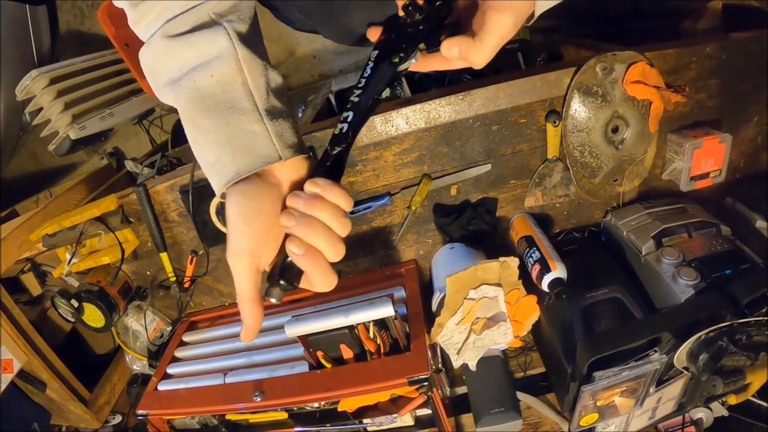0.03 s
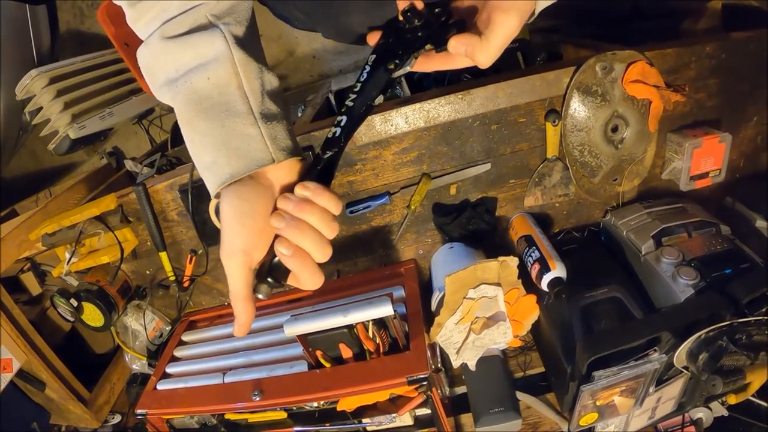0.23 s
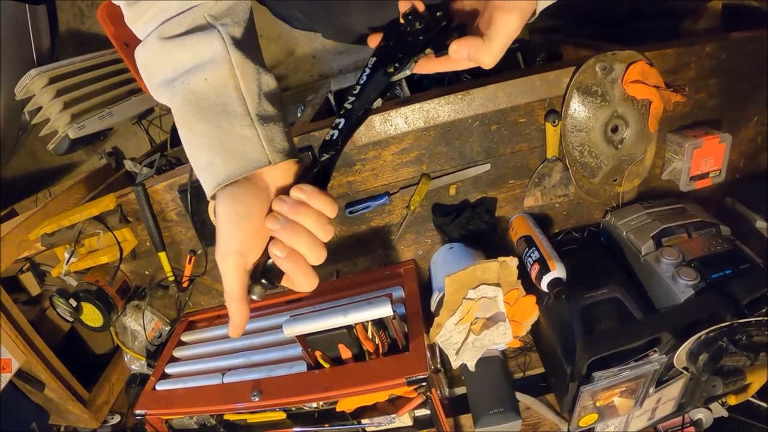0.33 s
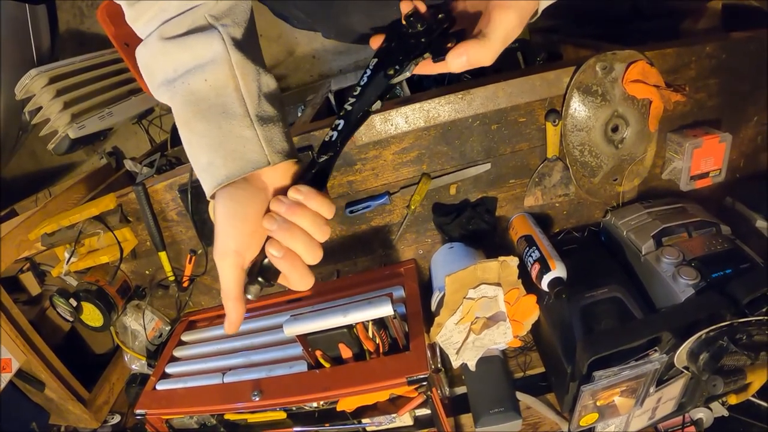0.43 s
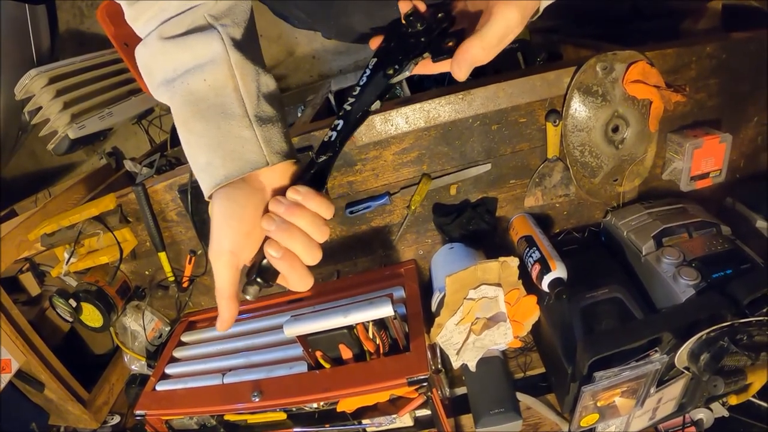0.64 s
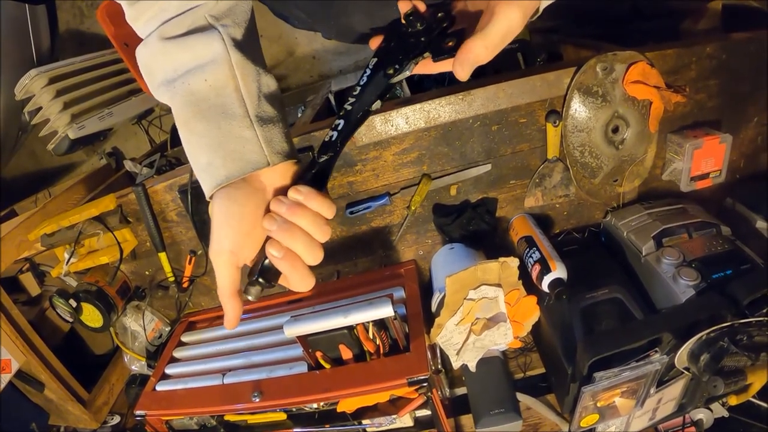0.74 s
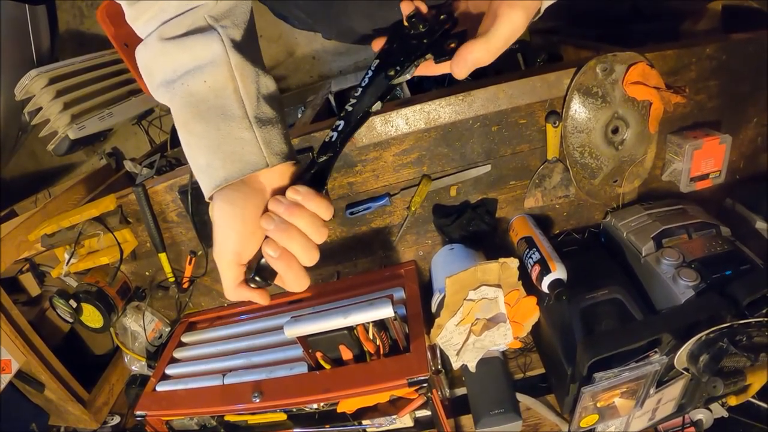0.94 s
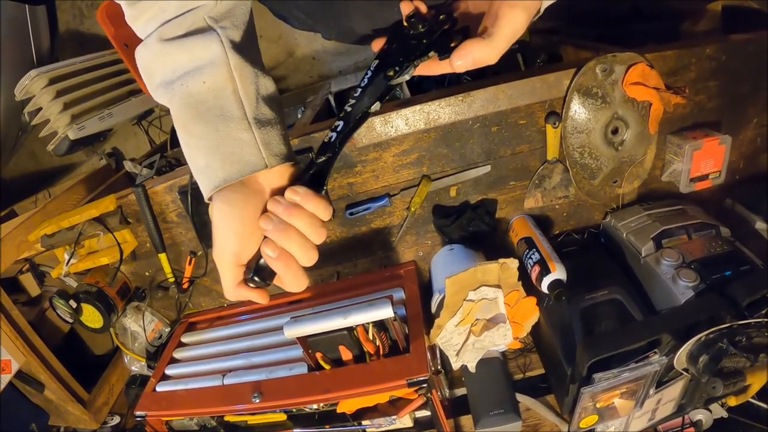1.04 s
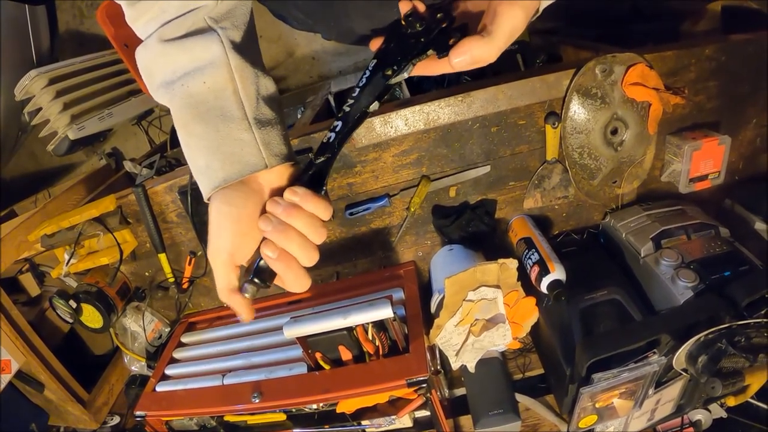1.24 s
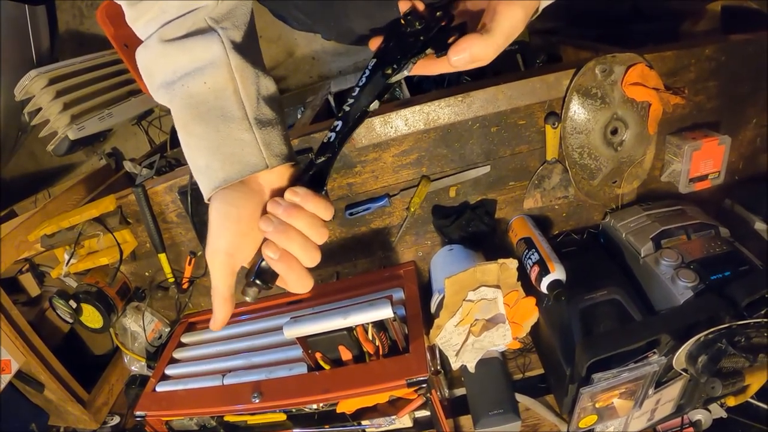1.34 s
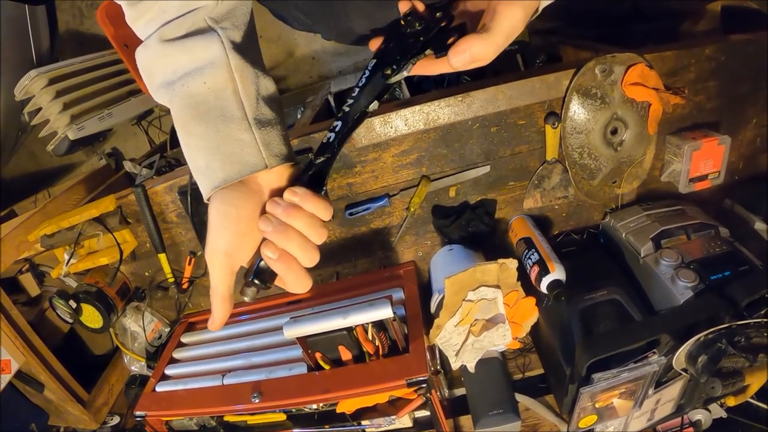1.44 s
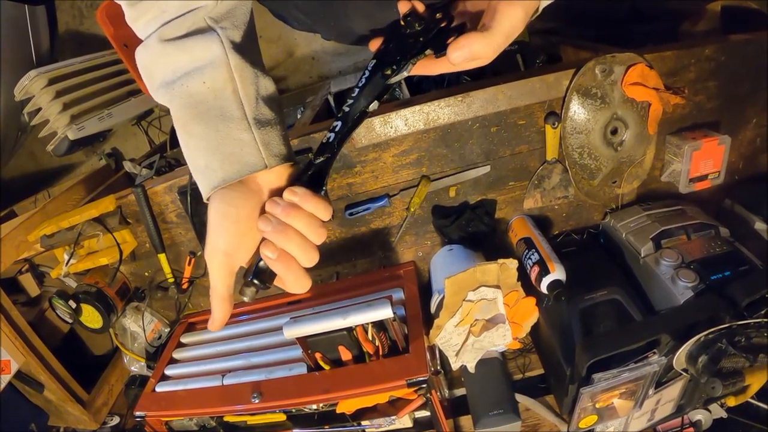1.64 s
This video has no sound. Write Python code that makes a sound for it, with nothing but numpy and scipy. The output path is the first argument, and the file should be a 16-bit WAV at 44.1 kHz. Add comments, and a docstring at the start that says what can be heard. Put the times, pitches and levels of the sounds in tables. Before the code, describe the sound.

Handbrake lever clicking: a rapid three-tooth metallic snap, small button rattles, and a sharp closing double click.

```python
"""A low shop murmur with a thin whine and a soft rustle comes first, made of flickering noise and a sine.
Then a loose handbrake lever is worked by hand: the pawl snaps over three teeth, with thuds and low thumps.
The release button and its rod then tap, rattle and snap back; a second rustle passes in between.
Each blow is a chatter of contacts that rings decaying steel modes and makes a broad click.
The shed answers with a short bright tail of fading noise; a two-port microphone picks it all up."""
import sys
import numpy as np
from scipy import signal
from scipy.fft import rfft, irfft
from scipy.io import wavfile
from scipy.ndimage import uniform_filter1d

SR = 44100
rng = np.random.default_rng(int(sys.argv[2]) if len(sys.argv) > 2 else 0)


def persist_wave(psi):
    """Save psi, clipped to +-1, as 16-bit WAV."""
    counts = np.round(np.clip(psi, -1, 1) * 32767).astype(np.int16)
    wavfile.write(sys.argv[1], SR, np.atleast_2d(counts).T)


def undo_db(level):
    """Turn decibels back into plain size, where 20 dB means ten times bigger."""
    steps = np.asarray(level, float) / 20
    return 10 ** steps


N = 72765
T = np.arange(N) / SR  # time in s
FREQ_HZ = np.fft.rfftfreq(2 * N, 1 / SR)

# Levels are relative, ahead of the microphone's colour, unless a comment says otherwise.
# murmur spectrum: [f/Hz, density/dB per Hz]
MURMUR_SPECTRUM = [(15, -6), (38, -0.5), (60, -12), (85, -19.5), (125, -14), (160, 0.5), (230, -3.5),
                   (400, -9), (650, -21.5), (1200, -18.5), (1850, -21.5), (2800, -25.5), (5000, -35),
                   (9000, -41), (16000, -45)]
# how loud the murmur is over time: [t/s, level/dB]
MURMUR_LEVEL = [(0, -62), (.1, -63.5), (.2, -64.5), (.5, -69), (.8, -69.5), (1.1, -69.5), (1.4, -68),
                (1.65, -71)]
MURMUR_LIKENESS = 0.15  # share of noise power common to both ports
FLICKER_DB = 1.5  # spread of each band's level before slewing
WHINE_HZ, WHINE_DB = 3141, -88.5
# rustles of cloth or skin: [start t/s, length/s, typical level/dB, centre f/Hz]
RUSTLES = [(0.018, 0.067, -76, 2530), (0.643, 0.193, -80, 1813)]

# the pawl snaps over a tooth: [t/s, level/dB, rod ring/dB, treble/dB, chatter/s]
SNAPS = [(0.2235, -9, -19, -6.5, 0.0025), (0.2484, -12, -8, 1, 0.0024), (0.2825, -14, -12, 1.5, 0.0031)]
# button and rod knock inside the lever: [t/s, level/dB, rod ring/dB, treble/dB, chatter/s]
BUTTON_BLOWS = [(0.5363, -44.5, -1, -13.5, 0.0052), (0.5417, -32, -3.5, -8, 0.0023),
                (.5545, -42, -25, -18.5, .002), (0.945, -60, -3.5, -6.5, 0.021),
                (.966, -56.5, 10, -2.5, 0.014), (0.9766, -41.5, 6, -6.5, .004), (0.9888, -41, 9, 5, 0.0041),
                (0.9978, -29, -20, -3.5, 0.0054), (1.015, -41.5, 3, -17, 0.0036),
                (1.0193, -32, -38, -13.5, 0.0007), (1.0265, -60, 7, -23, 0.0015),
                (1.333, -47.5, 6.5, -9.5, .008), (1.3444, -25, 3.5, -2, 0.0047),
                (1.3509, -23, -22, 6, 0.0053)]
# light taps of the rod: [t/s, level/dB, push/s]
TAPS = [(0.5043, -31.5, 0.005), (0.519, -54, 0.0012), (0.5244, -51, 0.0011), (.9505, -56, .001),
        (0.958, -35.5, 0.0095), (1.188, -75, .003), (1.2002, -41, 0.00039), (1.206, -43, .001),
        (1.22, -65, 0.0005)]
# the lever's mass thuds in the hands: [t/s, level/dB before its swell]
THUDS = [(0.222, -26), (0.2468, -21), (0.2832, -43), (1.343, -42.5)]
# low thumps, mostly on the left port, added after the microphone's colour: [t/s, level/dB, length/s]
THUMPS = [(.2545, -31, .004), (.2635, -41, .007), (.289, -35, .004)]

# ringing modes of the lever: [f/Hz, level/dB, time to fall 60 dB/s]
LEVER_MODES = [(2400, -32, 0.0084), (2771, -9.5, 0.06), (3003, -1.5, .018), (3560, -3, .015),
               (3570, 10, 0.006), (4314, 1.5, 0.0057), (5430, -1.5, .02), (5974, -7.5, .025),
               (6020, -8, 0.013), (7155, -10, 0.0063), (8310, -1, 0.018), (9300, -10.5, 0.032),
               (10890, -24, 0.045), (12700, -27.5, .015)]
# ringing modes of the release rod and its spring: [f/Hz, level/dB, time to fall 60 dB/s]
ROD_MODES = [(1396, -11, 0.005), (1738.5, -3.5, 0.049), (1826.6, 0, 0.04), (1983, -9, .03)]
# toothed plate, rung by the pawl: [f/Hz, level/dB, time to fall 60 dB/s]
PLATE_MODES = [(725, -27, .05), (2745, -18, .38), (2700, -21, .33), (3540, -26, .3), (3590, -28, .28)]
# button cap, rung by its knocks: [f/Hz, level/dB, time to fall 60 dB/s]
BUTTON_MODES = [(402, -26.5, 0.031), (762, -18, 0.028), (956, -12.5, 0.015), (1090, -43, 0.0088),
                (4700, -17.5, 0.14)]
TREBLE_HZ = 4920  # lever's treble tilt: none an octave below, full here, 1.5 times half an octave above
SCATTER_DB = 4  # mode strengths vary by this from blow to blow
FIRST_CONTACT = 0.35  # force of the first touch
LEVER_LOW_HZ = 1300  # lever and rod radiate little below
THIN_HZ = 300  # small steel parts radiate no bass

# click of a contact: gain, lower and upper edges, weak low body
CRACK_DB, CRACK_LOW_HZ, CRACK_HIGH_HZ, CRACK_BODY_DB = 18.5, 2500, 8800, -18.5
# faint copies lead up to the first snap: level, level step from copy to copy, decay, spacing
LEAD_FIRST_DB, LEAD_FADE_DB, LEAD_DECAY_S, LEAD_STEP_S = -22, -13, 0.008, 0.0107
TAP_TICK_DB, TICK_PUSH_S = 7.5, 0.0003  # slower pushes weaken the tick
THUMB_T60_S = 0.03  # the thumb damps the rod
THUD_HZ, THUD_T60_S = 185, 0.016
THUMP_RIGHT_DB = -16.5  # right port against left

# shed tail: [centre f/Hz, level/dB, time to fall 60 dB/s]
SHED_BANDS = [(247, -14, 0.3), (700, -14.5, 0.18), (1540, -1.5, 0.32), (3240, -8, 0.28), (5585, -14, .34),
              (10000, -24.5, .3), (13500, -19.5, .28)]
SHED_DELAY_S = 0.004  # silent until here, full at twice this
SHED_LIKENESS = 0.48  # share of noise power common to both ports
SHED_BEND = 0.99  # below 1: the fall slows very slightly
RING_TO_SHED_DB = -9  # the modes beam at the microphone, the shed hears mostly the click

# level balance of the ports: [f/Hz, left minus right/dB]
LEFT_BALANCE = [(200, 0), (1300, -1.5), (2400, .5), (4400, 3), (8100, 5), (12000, 0)]
# how far the left port leads: [f/Hz, phase/radians]
LEFT_LEAD = [(0, 0.55), (3900, 1.1), (6500, 1.8), (8300, 1.2), (11000, 2.1), (16000, 2.6)]
# microphone roll-off: [f/Hz, gain/dB]
MICROPHONE = [(10500, 1), (13000, -3), (16000, -7.5)]
CEILING, TOP_HZ = 0.75, 16300  # soft limit of the peaks, and upper edge of the sound


def shape(x, gain):
    """Multiply the spectrum by a gain."""
    return irfft(rfft(x, 2 * N) * gain)[..., :N]


def colour(table):
    """Gain at every frequency from (f/Hz, dB) points."""
    hz, db = np.array(table, float).T[:2]
    return undo_db(np.interp(np.log(FREQ_HZ + 1), np.log(hz), db))


def band(centre_hz, octaves):
    """Bell-shaped band gain."""
    return np.exp(-(np.log2((FREQ_HZ + 1) / centre_hz) / octaves) ** 2)


def highpass(x, order, hz):
    """Remove what lies below a frequency."""
    return signal.sosfilt(signal.butter(order, hz, "highpass", fs=SR, output="sos"), x)


def unit(x):
    """Scale to rms 1."""
    return x / np.sqrt(np.mean(x ** 2))


def pair(likeness):
    """Two noises that share a part of their power."""
    common, own = rng.standard_normal(N), rng.standard_normal((2, N))
    return np.sqrt(likeness) * common + np.sqrt(1 - likeness) * own


def walk(rate):
    """Random levels held 1 / rate s and slewed."""
    k = int(SR / rate)
    held = np.repeat(rng.standard_normal(N // k + 1), k)
    return uniform_filter1d(held, k)[:N]


def fall(t, t60):
    """Exponential decay that falls 60 dB in t60."""
    return np.exp(-np.log(1000) * t / t60)


def ring(modes, extra_db):
    """Impulse response of a struck part: a sum of decaying sines."""
    hz, db, t60 = np.array(modes, float).T[:, :, None]
    t = T[:SR // 3]
    return np.sum(undo_db(db + extra_db[:, None]) * fall(t, t60) * np.sin(2 * np.pi * hz * t), axis=0)


def add(out, at_s, sound):
    """Mix a sound in at a time."""
    i = int(at_s * SR)
    out[..., i:i + sound.shape[-1]] += sound[..., :N - i]


def murmur():
    """Shop noise: octave bands of coloured noise whose levels flicker separately."""
    noise = unit(shape(pair(MURMUR_LIKENESS), colour(MURMUR_SPECTRUM)))
    centres_hz = 30 * 2.0 ** np.arange(10)
    flickering = sum(shape(noise, band(hz, 1.0)) * undo_db(FLICKER_DB * walk(9.8)) for hz in centres_hz)
    return unit(flickering) * undo_db(np.interp(T, *np.array(MURMUR_LEVEL).T))


def whine():
    """A thin steady sine."""
    return undo_db(WHINE_DB) * np.sin(2 * np.pi * WHINE_HZ * T)


def rustles():
    """Cloth or skin: swelling bands of noise with a fast uneven level."""
    out = np.zeros((2, N))
    for (s, length, db, hz), octaves in zip(RUSTLES, (1.6, 0.25)):
        arch = np.sin(np.pi * np.clip((T - s) / length, 0, 1))
        window = np.clip(arch * 2, 0, 1)
        noise = unit(shape(pair(0.76), band(hz, octaves)))
        out += undo_db(db + 3.83 * walk(110)) * window * noise
    return out


def crack(force, high_hz):
    """The broad click of a contact: its force between two edges, with a weak low body."""
    click = highpass(force, 4, CRACK_LOW_HZ) + undo_db(CRACK_BODY_DB) * force
    return signal.sosfilt(signal.butter(4, np.clip(high_hz, 3000, 16000), fs=SR, output="sos"), click)


def blow(part, db, rod_db, treble_db, chatter_s):
    """A first contact and dying chatter strike lever, rod and a part; rows are ring and click."""
    t = T[:1024]
    force = rng.standard_normal(1024) * np.exp(-t / max(chatter_s, 2e-4))
    force = force / np.sqrt(np.sum(force ** 2))
    force[0] = FIRST_CONTACT
    tilt_db = treble_db * np.clip(np.log2(np.array(LEVER_MODES)[:, 0] / TREBLE_HZ) + 1, 0, 1.5)
    lever_ring = ring(LEVER_MODES, tilt_db + SCATTER_DB * rng.standard_normal(len(LEVER_MODES)))
    rod_ring = ring(ROD_MODES, rod_db + SCATTER_DB * rng.standard_normal(len(ROD_MODES)))
    body = highpass(lever_ring + rod_ring, 4, LEVER_LOW_HZ)
    part_ring = ring(part, np.zeros(len(part)))
    rung = signal.fftconvolve(force, body + part_ring)[:SR // 3] / 2
    # more treble also opens the click's upper edge
    padded = np.pad(force, (0, SR // 3 - 1024))
    click = undo_db(CRACK_DB) * crack(padded, CRACK_HIGH_HZ * 2 ** (treble_db / 14))
    return undo_db(db) * np.array([rung, click])


def pawl_snaps():
    """The pawl strikes the toothed plate; four faint copies lead up to the first snap."""
    out = np.zeros((2, N))
    for k, (s, *how) in enumerate(SNAPS):
        sound = blow(PLATE_MODES, *how)
        add(out, s, sound)
        if k == 0:
            short = sound * np.exp(-T[:SR // 3] / LEAD_DECAY_S)
            for step in range(4):
                add(out, s - (step + 1) * LEAD_STEP_S, undo_db(LEAD_FIRST_DB + step * LEAD_FADE_DB) * short)
    return out


def shed(dry):
    """Diffuse tail: each band of noise decays at its own rate, set off by the dry sound."""
    noise, tail = pair(SHED_LIKENESS), 0
    for hz, db, t60 in SHED_BANDS:
        decay = np.exp(-np.log(1000) * (T / t60) ** SHED_BEND)
        tail = tail + undo_db(db) * shape(noise, band(hz, 0.94)) * decay
    tail = tail * np.clip(T / SHED_DELAY_S - 1, 0, 1) / np.sqrt(SR / 40)
    return signal.fftconvolve(tail, dry[None], axes=1)[:, :N]


def hand_thuds():
    """The lever's mass thuds in the hands: a low decaying sine with a soft start."""
    out, t = np.zeros(N), T[:SR // 3]
    for s, db in THUDS:
        swell = 1 - np.exp(-t * THUD_HZ * 2)
        add(out, s, ring([(THUD_HZ, db, THUD_T60_S)], np.zeros(1)) * swell)
    return out


def low_thumps():
    """Single low pulses with a negative peak, mostly on the left port."""
    out = np.zeros((2, N))
    for s, db, length in THUMPS:
        u = (T - s) / length
        pulse = (1 - u ** 2) * np.exp(-u ** 2)
        out -= undo_db(db) * np.array([[1], [undo_db(THUMP_RIGHT_DB)]]) * pulse
    return out


def rod_taps():
    """A push swells the thumb-damped rod and makes a small tick; rows are ring and click."""
    out, t = np.zeros((2, N)), T[:SR // 3]
    for s, db, push_s in TAPS:
        chance = rng.standard_normal(400)
        swell = (1 - np.exp(-t / push_s)) * fall(t, THUMB_T60_S)
        add(out[0], s, undo_db(db) * swell * ring(ROD_MODES, SCATTER_DB * chance[:len(ROD_MODES)]))
        tick = crack(chance * np.exp(-t[:400] / 0.0031), 3330.0)
        add(out[1], s, undo_db(db + TAP_TICK_DB) / (1 + push_s / TICK_PUSH_S) * tick)
    return out


def button_blows():
    """Button and rod knock inside the lever and ring the button cap too."""
    out = np.zeros((2, N))
    for s, *how in BUTTON_BLOWS:
        add(out, s, blow(BUTTON_MODES, *how))
    return out


def microphone(x):
    """Two ports differ in level and phase and share one treble colour."""
    lean = np.sqrt(colour(LEFT_BALANCE))
    lag = np.exp(-1j * np.interp(FREQ_HZ, *np.array(LEFT_LEAD).T))
    ports = np.array([lean + 0j, lag / lean])
    return shape(x, ports * colour(MICROPHONE))


def scene():
    """Murmur, whine, rustles, the lever with its shed tail, and the thumps."""
    background = murmur() + whine() + rustles()
    rung, click = highpass(pawl_snaps() + rod_taps() + button_blows(), 3, THIN_HZ)
    rung = rung + hand_thuds()
    tail = shed(click + undo_db(RING_TO_SHED_DB) * rung)
    return microphone(rung + click + tail + background) + low_thumps()


def roll_off(x):
    """The treble ends steeply here."""
    return signal.sosfilt(signal.butter(12, 16500, fs=SR, output="sos"), x)


def record(dry):
    """The camera rounds the highest peaks and cuts the top."""
    rounded = CEILING * np.tanh(dry / CEILING)
    mix = signal.sosfilt(signal.ellip(8, 0.2, 70, TOP_HZ, fs=SR, output="sos"), rounded)
    return roll_off(mix)


dry = scene()
out = record(dry)
persist_wave(out)
```